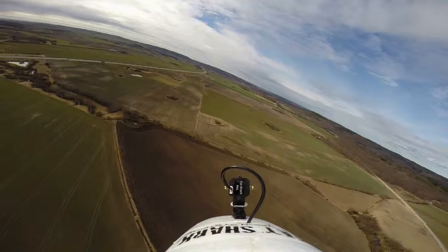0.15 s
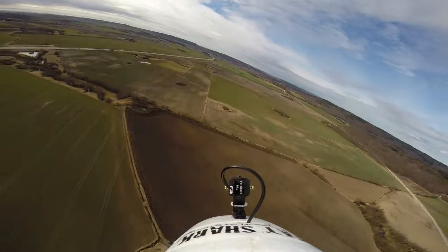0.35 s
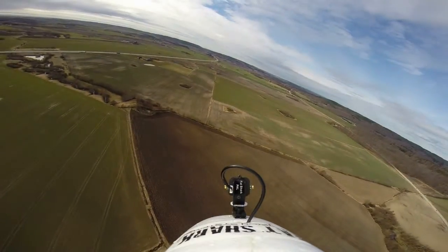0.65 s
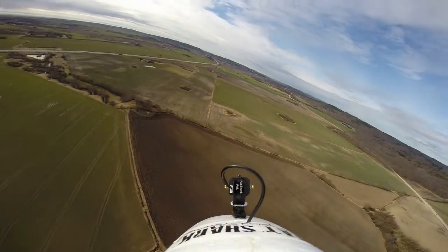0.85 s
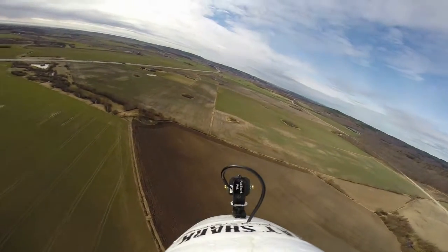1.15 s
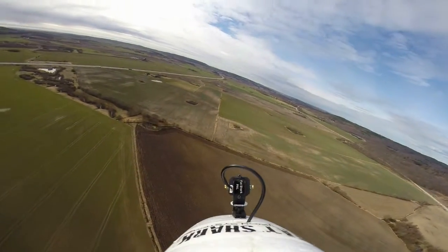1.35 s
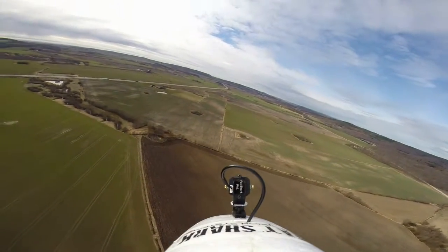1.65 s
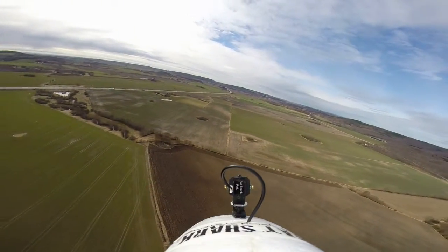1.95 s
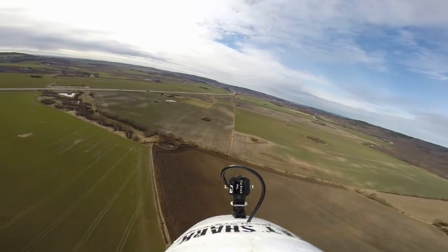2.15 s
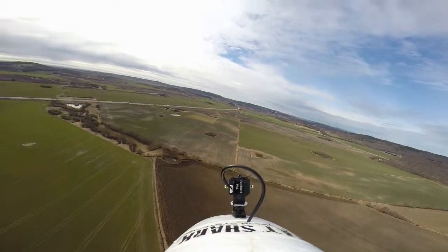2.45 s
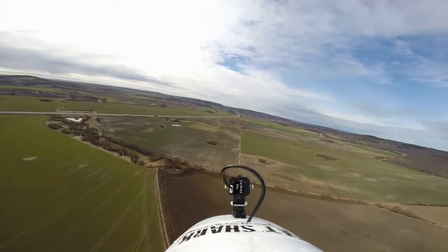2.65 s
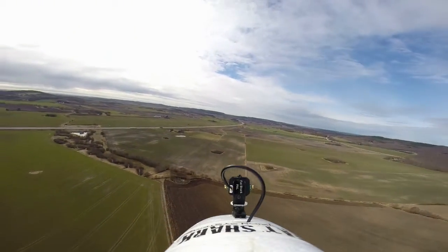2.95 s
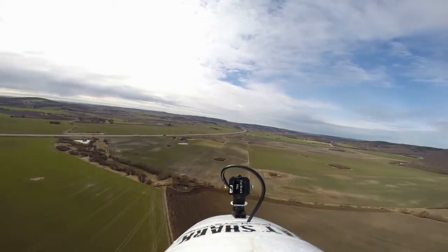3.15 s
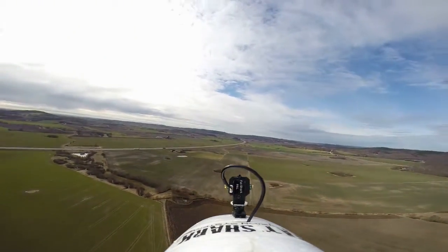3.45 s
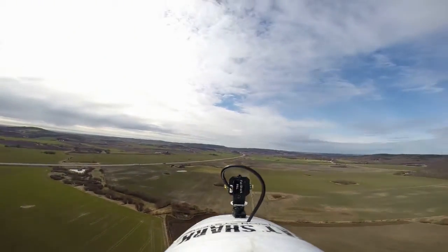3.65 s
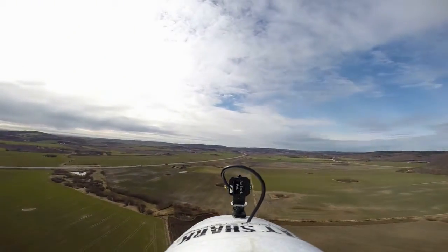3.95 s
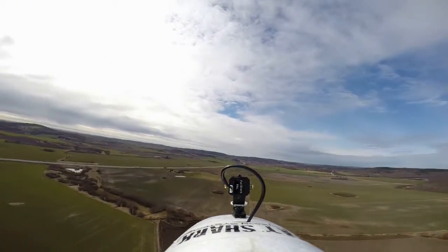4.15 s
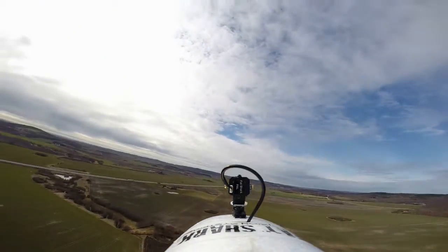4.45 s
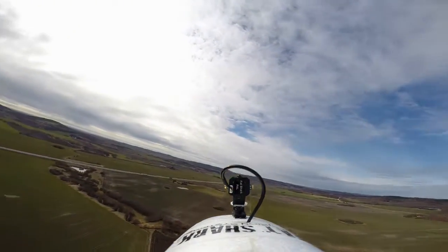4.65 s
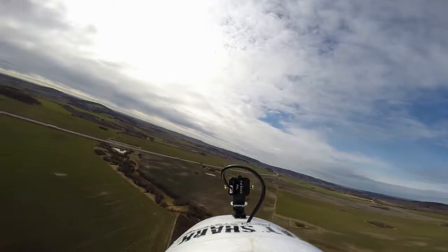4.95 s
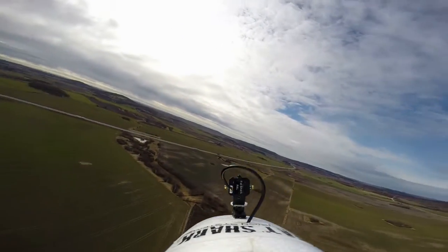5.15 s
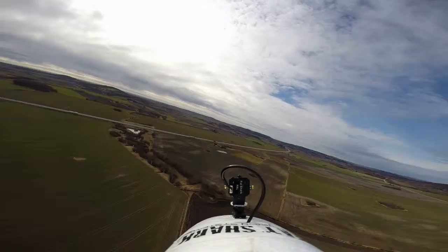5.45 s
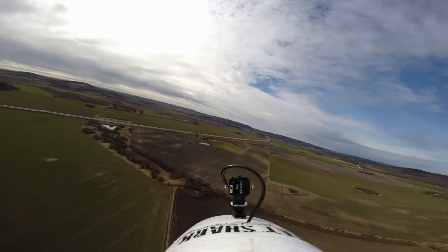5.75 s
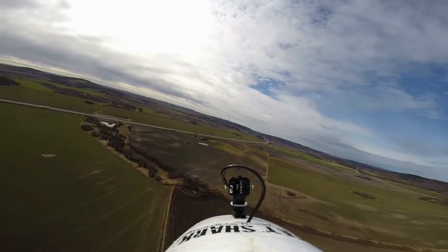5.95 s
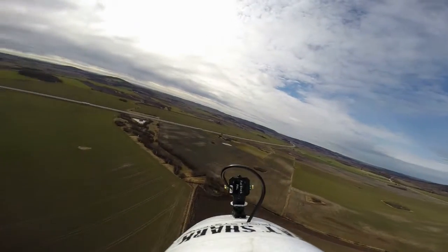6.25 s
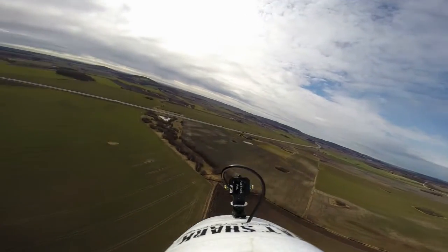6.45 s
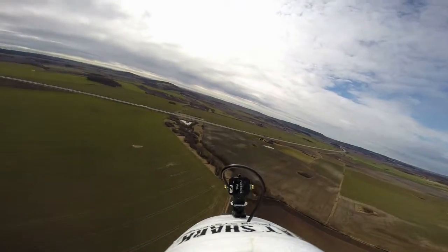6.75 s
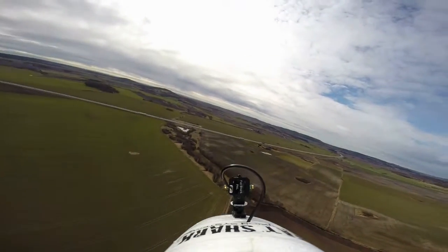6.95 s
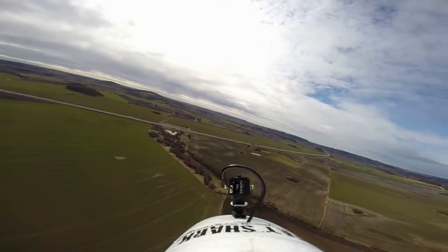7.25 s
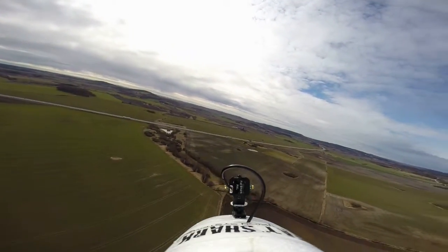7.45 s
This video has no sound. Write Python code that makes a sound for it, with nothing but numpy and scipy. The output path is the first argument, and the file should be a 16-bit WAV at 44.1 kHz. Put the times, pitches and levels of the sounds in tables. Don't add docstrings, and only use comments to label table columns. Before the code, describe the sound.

A small electric propeller motor hums at full speed, glides down to a stop, then rushing wind takes over with low buffeting and rattling servo bursts.

```python
import sys
import numpy as np
from scipy import signal
from scipy.fft import rfft, irfft, next_fast_len
from scipy.io import wavfile

SR = 44100
rng = np.random.default_rng(int(sys.argv[2]) if len(sys.argv) > 2 else 0)


def voltage_ratio(decibels):
    exponent = np.asarray(decibels, float) / 20
    return 10 ** exponent


def master(y):
    cut = np.clip(np.atleast_2d(y).T, -1, 1)
    pcm = np.round(cut * 32767)
    wavfile.write(sys.argv[1], SR, pcm.astype(np.int16))


N = 334719

# time in seconds, shaft speed in turns per second.
SHAFT_SPEED = [(0, 135.3), (.58, 135.3), (.73, 132.9), (.85, 125.6), (1.08, 104.4), (1.3, 92.6),
               (1.5, 78.9), (1.75, 54.6), (2.08, 23)]
# start in seconds, length in seconds, twitch level at its end in dB,
# whine level in dB.
ARM_TRAVELS = [
    (4.855, 0.72, -18.5, -55),
    (6.2, 0.13, -22, -72),
    (6.43, .54, -22, -54.5),
    (6.97, .2, -27, -61),
]
ARM_EDGE_S = 0.099


def in_time(rows):
    seconds, *columns = np.transpose(rows)
    return [np.interp(np.arange(N) / SR, seconds, column) for column in columns]


def rms_one(x):
    return x / np.sqrt(np.mean(x ** 2) + 1e-20)


def drift(rate):
    r = np.exp(-64 * np.pi * rate / SR)
    noise = rng.standard_normal(N // 32 + 2002)
    slow = signal.lfilter([1], [1, -2 * r, r * r], noise)[2000:]
    return np.interp(np.arange(N) / 32, np.arange(len(slow)), rms_one(slow))


def band(x, low_hz, high_hz):
    return signal.sosfilt(signal.butter(2, [low_hz, high_hz], "band", fs=SR, output="sos"), x)


def noise_band(low_hz, high_hz):
    return rms_one(band(rng.standard_normal(N), low_hz, high_hz))


def peaks_db(table, hz):
    return sum(boost_db / (1 + (2 * (hz - centre) / width) ** 2) for centre, width, boost_db in table)


def gate(start, end, edge):
    t = np.arange(N) / SR
    return np.clip(np.minimum(t - start, end - t) / edge + .5, 0, 1)


def motor():
    # time in seconds, level in dB.
    torque = [(0, 0.5), (.5, 0), (.75, 0.56), (.9, 0), (1.05, -2.1), (1.25, -4.5), (1.5, -4), (1.75, -6.5),
              (2.08, -25)]
    # level in dB, share of the torque swing.
    orders = [(-2.5, 1.8), (-19, .05), (-32, 1.07), (-42.5, -0.1), (-49, 0.68), (-49, 1.6), (-57, 2.8),
              (-54, 1.2), (-58.5, 0.47), (-46, 3.7), (-38.5, 0.4), (-40.5, 4), (-35.5, 0.5), (-43, 1.3),
              (-41.5, 3.5), (-53, 2), (-50.5, 2), (-49, 1.1), (-59, 2.7), (-58, 2.6), (-56.5, .8),
              (-58, 1.3), (-51.5, 0.49), (-54, 0.66), (-58, 0.67), (-50.5, .4), (-58, 0.45), (-44, 4.1)]
    # frequency in Hz, width in Hz, boost in dB.
    airframe = [(41, 7.3, -31), (65.6, 10, -7.5), (84, 36, 2.5), (134, 46.4, -16), (243, 16, 3),
                (273.4, 12, -16.5), (413.3, 66, 14.5), (804, 190, 9), (900, 37, 7), (1180, 61, -10.5),
                (1440, 380, 12), (1643, 183, 12), (2205, 276, 18), (2617, 320, 21.5)]
    blade_stop_s, teeth_stop_s, stop_fade_s = 1.92, 1.9, 0.18
    blade_waver_db, teeth_waver_db = 0.97, 1.5
    unsteady_db = 6

    end = round(SHAFT_SPEED[-1][0] * SR)
    turns = in_time(SHAFT_SPEED)[0]
    torque_db = in_time(torque)[0]
    angle = 2 * np.pi * np.cumsum(turns * (1 + .0012 * drift(27))) / SR
    braking_db = 6 * gate(.84, 1.08, stop_fade_s)
    blades_on = gate(-1, blade_stop_s, stop_fade_s)[:end]
    teeth_on = gate(-1, teeth_stop_s, stop_fade_s)[:end]
    out = np.zeros(N)
    for k, (order_db, share) in enumerate(orders, start=1):
        waver_db = blade_waver_db if k < 4 else teeth_waver_db * (1 - torque_db / unsteady_db)
        change_db = share * torque_db + waver_db * drift(16)
        if 18 < k < 28:
            change_db = change_db + braking_db
        level_db = order_db + change_db[:end] + peaks_db(airframe, k * turns[:end])
        running = teeth_on if k > 3 else blades_on
        sine = np.sin(k * angle[:end] + rng.uniform(0, 2 * np.pi))
        out[:end] += np.sqrt(2) * voltage_ratio(level_db) * running * sine
    return out


def controller():
    # start in seconds, end in seconds, switching tone in dB,
    # winding hiss in dB.
    driven = [
        (-.1, .93, -50, -61),
        (.93, 1.5, -74, -81),
        (1.5, 2.2, -58, -66),
    ]
    switching_hz, steps_per_turn = 8017.7, 42
    edge_s, beat_end_s = .1, .72

    t = np.arange(N) / SR
    turned = np.cumsum(in_time(SHAFT_SPEED)[0]) / SR
    tone_level, hiss_level = np.zeros(N), np.zeros(N)
    for start, end, tone_db, hiss_db in driven:
        on = gate(start, end, edge_s)
        tone_level += voltage_ratio(tone_db) * on
        hiss_level += voltage_ratio(hiss_db) * on
    tone = tone_level * np.sin(2 * np.pi * switching_hz * t)
    beat = np.sin(2 * np.pi * (switching_hz * t - steps_per_turn * turned))
    beat *= voltage_ratio(-28 + 1.5 * drift(45)) * gate(-1, beat_end_s, edge_s)
    return np.sqrt(2) * (tone + beat) + hiss_level * noise_band(7500, 11500)


def airflow():
    # time in seconds, airspeed level in dB, how squarely it strikes the cavity mouths in dB.
    air = [(0, -10.5, -2), (.7, -7.5, -1.5), (1.2, -12.5, 5), (1.8, -9.5, -1), (2.2, -6, 0.5),
           (2.65, -2, 0.5), (3.25, 1.2, -0.6), (3.9, -2, 1), (4.5, -4, 2.5), (4.95, -8, -2), (5.2, -8, -4),
           (5.5, -9.5, -2.5), (5.85, -9, 1.5), (6.3, -8, 0.5), (6.7, -6.5, -2.5), (7.0, -9.5, -1.5),
           (7.25, -7.5, 1), (7.59, -6, 4)]
    # frequency in Hz, level in dB per Hz.
    tilt = [(15, -18.5), (30, 4), (80, 0), (200, -6), (450, -22), (1000, -25), (2000, -19.5), (3300, -20),
            (4700, -34.5), (7000, -34.5), (8500, -42.5), (11000, -50), (13500, -55), (15500, -69)]
    # frequency in Hz, width in Hz, boost in dB.
    cavities = [(1528, 440, 8), (2362, 780, 14), (2680, 83, 5), (3400, 290, 0), (4050, 355, 8.5),
                (4970, 650, 7.5), (5947, 800, 15.5), (6644, 270, 7.5), (7530, 430, 4)]
    # level at top speed in dB, share of airspeed, share of strike.
    layers = [
        (-19, 0.94, -0.029),
        (-27, 0.93, -0.26),
        (-20, 0.83, 1.13),
        (-26.5, 1.107, 0.62),
    ]
    regions_hz = [(20, 300), (450, 1200), (1900, 3000), (3500, 7500)]
    layer_centres = np.log([180, 700, 2300, 5000])

    size = next_fast_len(N)
    hz = np.maximum(np.arange(size // 2 + 1) * SR / size, 1)
    tilt_hz, tilt_db = np.transpose(tilt)
    colour_db = np.interp(np.log(hz), np.log(tilt_hz), tilt_db) + peaks_db(cavities, hz)
    coloured = rfft(rng.standard_normal(size)) * (hz > 10) * voltage_ratio(colour_db)

    speed_db, strike_db = in_time(air)
    curves = []
    for (db, by_speed, by_strike), (low_hz, high_hz) in zip(layers, regions_hz):
        power = np.mean(np.abs(coloured[(hz > low_hz) & (hz < high_hz)]) ** 2)
        region_rms = np.sqrt(power * (high_hz - low_hz) * 2 / SR) / np.sqrt(size)
        curves.append(db + by_speed * speed_db + by_strike * strike_db - 20 * np.log10(region_rms))

    spinning = gate(-1, 1.7, .2)
    gust = drift(33)
    out = np.zeros(N)
    for octave in np.arange(4, 14.5, .5):
        mask = np.cos(np.pi * np.clip(np.log2(hz) - octave, -.5, .5)) ** 2
        place = np.interp(octave * np.log(2), layer_centres, np.arange(4))
        low = min(int(place), 2)
        db = curves[low] + (place - low) * (curves[low + 1] - curves[low])
        db = db + max(place - 1, 0) * 0.47 * gust + 0.81 * drift(2.6)
        if octave > 13:
            db = db + 0.16 * (curves[3] - curves[3].mean())
        if octave < 6:
            db = db - 7.0 * spinning
        out += voltage_ratio(db) * irfft(coloured * mask, size)[:N]
    return out


def gear_kicks():
    # time in seconds, peak level in dB, frequency in Hz.
    kicks = [(5.146, -14, 1800), (5.1679, -10.5, 1910), (5.193, -11.5, 1840), (5.2109, -17, 2390),
             (5.2346, -13, 2200), (5.2773, -10, 1820), (5.3212, -16, 2070), (5.366, -15, 1920),
             (5.3884, -14.5, 2270), (5.4104, -12, 1890), (5.541, -17, 2220), (5.6967, -17, 2240),
             (5.764, -15, 2630), (5.7903, -18, 2400), (5.9172, -16.5, 2140), (5.9562, -20, 2310),
             (6.4665, -28, 1980), (6.5317, -14, 1900), (6.5748, -12, 2350), (6.6206, -15, 2240),
             (6.6434, -15.5, 1570), (6.7323, -20, 2010), (6.7553, -14, 1940), (6.7763, -11.5, 1850),
             (6.8152, -19, 2090), (6.8406, -11, 2140), (7.0388, -14, 2260), (7.0578, -20, 2100),
             (7.104, -14, 1950), (7.3097, -16, 2350)]
    kick_s, rattle, sag = .0075, .6, .11

    t = np.arange(400) / SR
    shape = np.sin(np.pi * np.clip(t / kick_s, 0, 1) ** .5) ** 2
    out = np.zeros(N)
    for s, db, hz in kicks:
        ring = np.sin(2 * np.pi * hz * t * (1 + sag * (1 - t / kick_s)))
        teeth = rms_one(band(rng.standard_normal(400), 0.56 * hz, 1.2 * hz))
        start = round((s - .0002) * SR)
        out[start:start + 400] += voltage_ratio(db - 1.5) * shape * (ring + rattle * teeth)
    return out


def servo_twitches():
    frame_s, first_frame_s, puff_s = .022016, 4.7490, .007
    growth_db = 11

    t = np.arange(N) / SR
    push = np.zeros(N)
    for start, length, end_db, _ in ARM_TRAVELS:
        still_to_go = np.clip(1 - (t - start) / (1.04 * length), 0, 1)
        push += voltage_ratio(end_db - growth_db * still_to_go) * gate(start, start + length, ARM_EDGE_S)
    frame = (t - first_frame_s) / frame_s
    strength = voltage_ratio(2 * rng.standard_normal(400))[np.clip(frame.astype(int), 0, 399)]
    puff = np.sin(np.pi * np.clip((frame % 1) * frame_s / puff_s, 0, 1)) ** 2
    puffs = push * strength * puff * noise_band(1600, 2600)
    return band(puffs + gear_kicks(), 700, 2900)


def servo_whine():
    effort = np.zeros(N)
    for start, length, _, db in ARM_TRAVELS:
        effort += voltage_ratio(db) * gate(start, start + length, ARM_EDGE_S)
    whine = noise_band(8300, 9400) + 0.37 * noise_band(10100, 10900) + 0.24 * noise_band(11000, 13200)
    grinding = voltage_ratio(23.0) * noise_band(1730, 1880)
    return effort * voltage_ratio(1.2 * drift(7)) * (whine + grinding)


def buffet():
    # time in seconds, peak level in dB, half length in seconds.
    gust_table = [(2.098, -22, .08), (2.488, -33, 0.046), (2.752, -32, 0.094), (3.405, -15.5, 0.067),
                  (3.75, -20, 0.13), (4.287, -14.5, 0.059), (4.55, -19, 0.23), (5.044, -21.5, 0.19),
                  (5.337, -13, 0.15), (5.62, -22, 0.1), (5.888, -16, 0.078), (6.144, -17, 0.15),
                  (6.727, -20, 0.11), (7.01, -17.5, 0.038), (7.302, -19.5, 0.35)]
    t = np.arange(N) / SR
    gusts = sum(voltage_ratio(db) * np.exp(-((t - s) / half) ** 2) for s, db, half in gust_table)
    shaking = band(band(rng.standard_normal(N), 49.4, 119.5), 49.4, 119.5)
    return voltage_ratio(-6.0) * gusts * rms_one(shaking)


def camera_electronics():
    return np.sqrt(2) * voltage_ratio(-89) * np.sin(2 * np.pi * 14625 * np.arange(N) / SR)


def scene():
    servo = servo_twitches() + servo_whine()
    return (motor() + controller() + airflow() + servo + buffet() + camera_electronics())[None]


def roll_off(x):
    return signal.sosfilt(signal.butter(12, 15750, fs=SR, output="sos"), x)


def record(dry):
    return roll_off(0.65 * np.tanh(dry / 0.75))


dry = scene()
out = record(dry)
master(out)
```